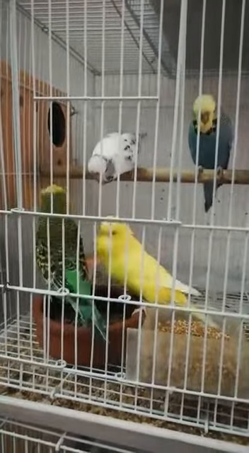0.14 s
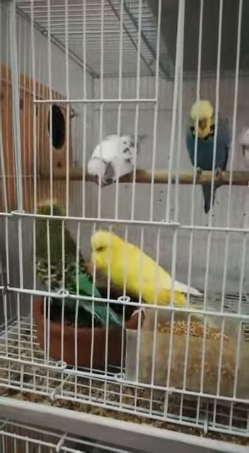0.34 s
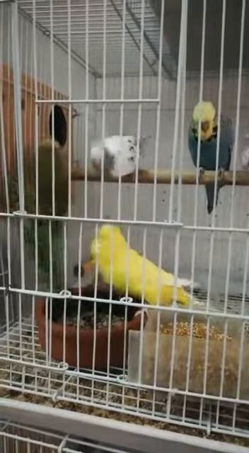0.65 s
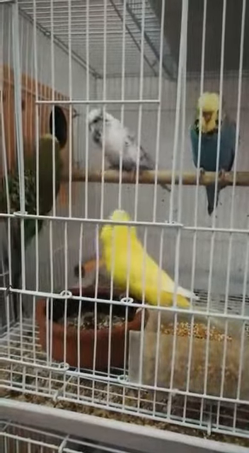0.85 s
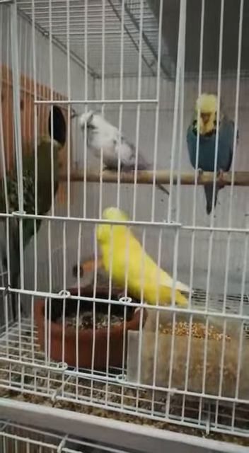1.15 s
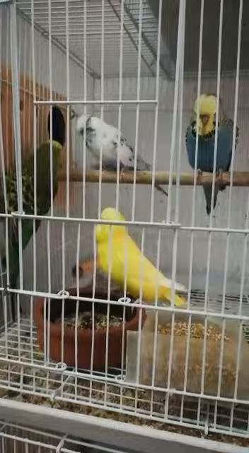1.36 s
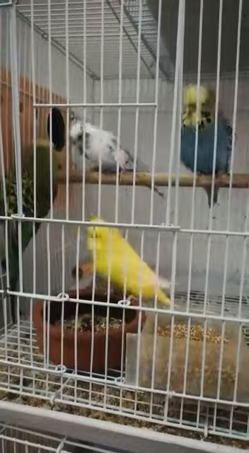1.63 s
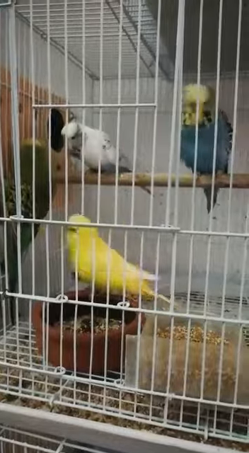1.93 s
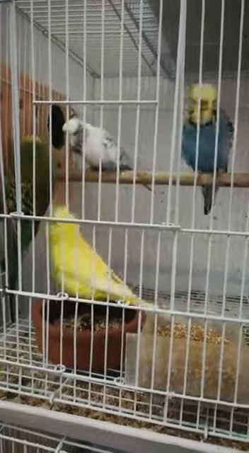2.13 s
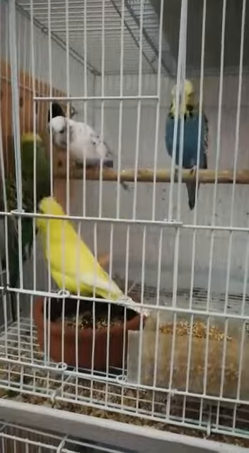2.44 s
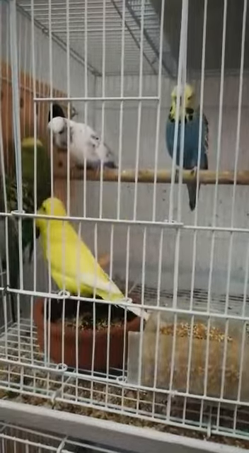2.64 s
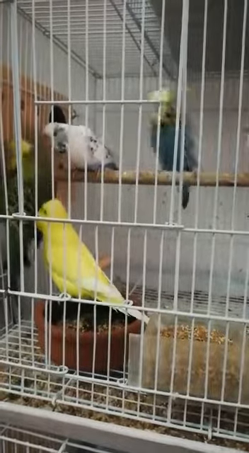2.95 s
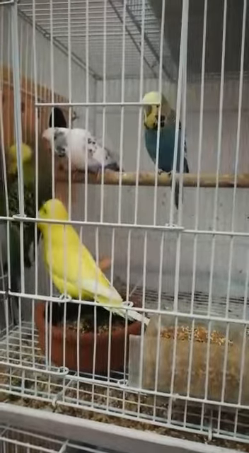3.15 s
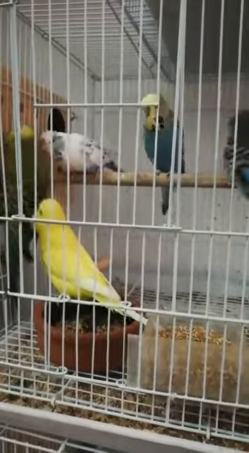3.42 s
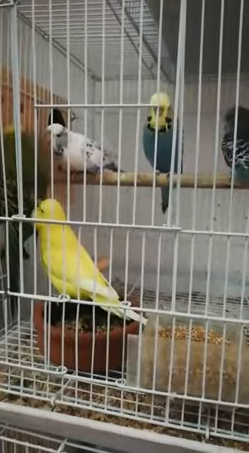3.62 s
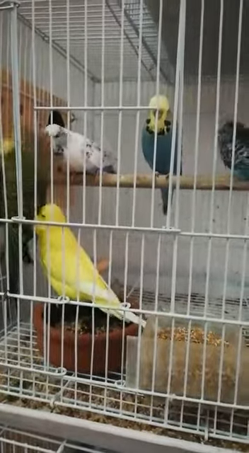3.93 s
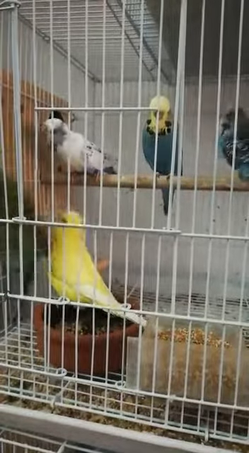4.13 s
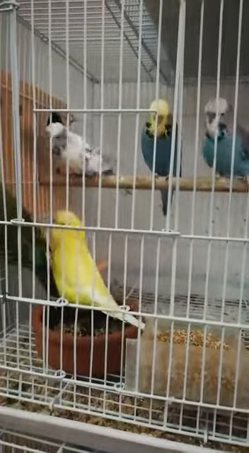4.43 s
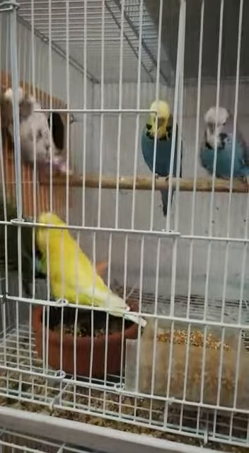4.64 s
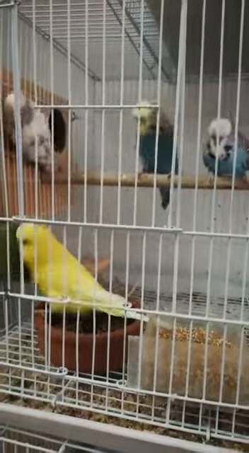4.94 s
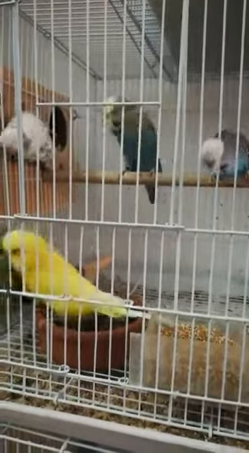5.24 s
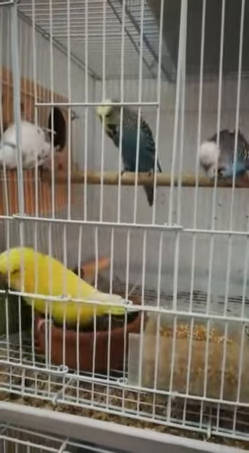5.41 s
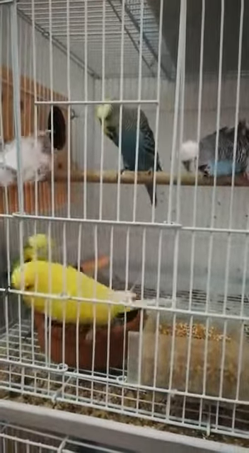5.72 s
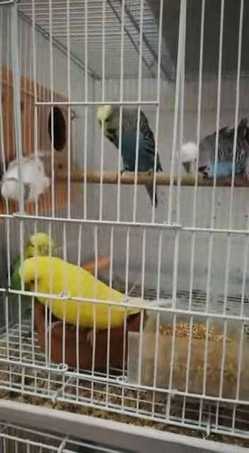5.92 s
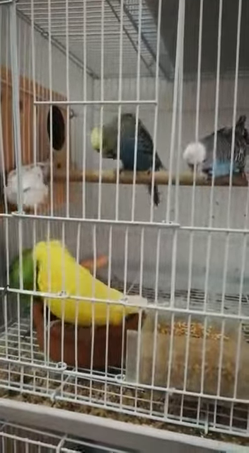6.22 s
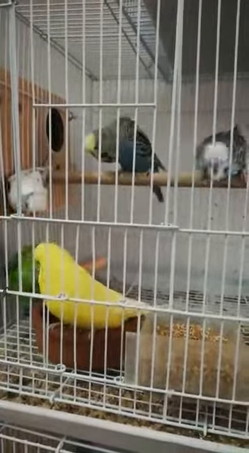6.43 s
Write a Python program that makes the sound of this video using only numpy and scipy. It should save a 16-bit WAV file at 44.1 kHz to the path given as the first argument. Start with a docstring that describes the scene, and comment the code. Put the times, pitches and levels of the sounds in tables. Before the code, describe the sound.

Several caged parakeets chirp, squawk and mutter in uneven bursts, loudest near the middle and end, over fainter distant bird chatter indoors.

```python
"""Loud chirps swoop around 3 kHz: a flock of small parrots chatters in a wire cage in a hard-walled room.
Between the chirps come soft warbles, thin whistles, a squeal, buzzy squawks, clucks, mutters and rasps.
Tonal calls are sums of harmonics on a gliding pitch; harsh calls are pulses and air through resonances.
Noise reflections ring on after each call, over shaped noise for farther birds and a low rumble."""
import sys
import numpy as np
from scipy import signal
from scipy.fft import rfft, irfft, next_fast_len
from scipy.io import wavfile
from scipy.ndimage import uniform_filter1d, minimum_filter1d, map_coordinates

SR = 44100
rng = np.random.default_rng(int(sys.argv[2]) if len(sys.argv) > 2 else 0)


def digitize_waveform(pressure):
    """Quantize a signal to 16-bit integers and store it at the path in sys.argv[1].

    Rows of a 2-D input are taken as channels; values are limited to [-1, 1].
    """
    field = np.atleast_2d(pressure).T
    bounded = np.clip(field, -1, 1)
    quanta = np.round(bounded * 32767).astype(np.int16)
    wavfile.write(sys.argv[1], SR, quanta)


N = 289737
TIME = np.arange(N) / SR
EDGE_HZ = 15400  # upper limit of the harmonics and of the final band


def gain_of(db):
    """Level law: decibels to amplitude."""
    return 10 ** (np.asarray(db) / 20)


def evened(x):
    """Normalisation: scales to rms 1."""
    return x / np.sqrt(np.mean(x ** 2) + 1e-20)


def read(points, hz):
    """Interpolation of a (Hz, value) curve on a log-frequency axis."""
    f, value = np.transpose(points)
    return np.interp(np.log(hz + 1), np.log(f + 1), value)


def coloured(x, points):
    """Linear filtering: multiplies the spectrum by a response given in dB."""
    size = next_fast_len(N + 4096)
    response = gain_of(read(points, np.fft.rfftfreq(size, 1 / SR)))
    return irfft(rfft(x, size) * response, size)[..., :N]


def wobble(size, hz):
    """Random modulation: smooth chance of rms about 1 with hz random knots a second."""
    knots = rng.standard_normal(4096)
    return map_coordinates(knots, [np.arange(size) * hz / SR], order=3, mode="wrap")


def patches(shape, frames, bins):
    """Random field smoothed over time and frequency, rms 1."""
    across_time = uniform_filter1d(rng.standard_normal(shape), frames, axis=1)
    return evened(uniform_filter1d(across_time, bins, axis=0))


def placed(sounds):
    """Superposition: adds (start_s, sound) pairs onto one track."""
    track = np.zeros(N)
    for start, sound in sounds:
        part = track[max(round(start * SR), 0):][:len(sound)]
        part += sound[:len(part)]
    return track


def syrinx(hz, throat_db):
    """Harmonic synthesis: up to eight partials on the pitch curve, weighted by the throat, at rms 1."""
    phase = 2 * np.pi * np.cumsum(hz) / SR
    k = np.arange(1, 9)[:, None]
    weights = gain_of(throat_db(k, k * hz)) * (k * hz < EDGE_HZ)
    partials = weights * np.sin(k * phase)
    return partials.sum(0) / np.sqrt((weights ** 2).sum(0) / 2 + 1e-12)


def tonal_call(rows, throat, jitter, flutter_db, flutter_hz, fade_s):
    """Frequency and amplitude modulation: the syrinx follows (s, Hz, dB, overtones dB) with a quiver."""
    s, *controls = np.transpose(rows)
    s = np.maximum.accumulate(s)
    t = np.arange(s[0] - fade_s / 2, s[-1] + fade_s / 2, 1 / SR)
    pitch, level, overtones_db = (uniform_filter1d(np.interp(t, s, c), size=120) for c in controls)
    quivering = pitch * (1 + jitter * wobble(len(t), flutter_hz))
    tone = syrinx(quivering, lambda k, hz: read(throat, hz) + overtones_db * (k > 1))
    edges = np.clip(np.minimum(t - t[0], t[-1] - t) / fade_s, 0, 1)
    fade = np.sin(np.pi / 2 * edges) ** 2
    return t[0], tone * fade * gain_of(level + flutter_db * wobble(len(t), flutter_hz))


def swoop(start, length, open_hz, middle_hz, close_hz, db, overtones_db):
    """Pitch glide: a parabola through three pitches at steady level, as (s, Hz, dB, overtones dB) rows."""
    u = np.linspace(-1, 1, 33)
    slope = (close_hz - open_hz) / 2
    bend = (open_hz + close_hz) / 2 - middle_hz
    hz = middle_hz + slope * u + bend * u ** 2
    return np.transpose([start + length * (u + 1) / 2, hz, np.full_like(u, db), np.full_like(u, overtones_db)])


def slurred(swoops):
    """Phase continuity: close swoops share one phrase; a wider gap or overlap between rows parts them."""
    slur_s = 0.004  # the rows of a very long swoop lie farther apart, so it becomes a string of short notes
    rows = np.vstack([swoop(*row) for row in swoops])
    return np.split(rows, np.flatnonzero(abs(np.diff(rows[:, 0])) > slur_s) + 1)


# loud chirps, each a quick string of swoops:
# start_s, length_s, open_pitch_hz, middle_pitch_hz, close_pitch_hz, level_db, overtones_db
CHIRP_SWOOPS = [ (.042, 0.014, 3650, 3300, 2710, -20.5, -18), (.083, 0.02, 3065, 2820, 3120, -14.5, -13),
                (.103, .009, 3200, 3120, 2900, -17.5, -15), (.113, 0.044, 2565, 2330, 2796, -17, -18),
                (.371, 0.012, 2500, 2430, 2680, -23.5, -16), (.388, .031, 3162, 3150, 3490, -13, -34),
                (.436, 0.016, 2730, 2850, 2300, -17, -24), (.459, 0.018, 3850, 3580, 3400, -11.5, -15.5),
                (1.026, 0.0087, 3740, 3690, 4190, -24, -24), (1.617, 0.0077, 5060, 4750, 4050, -22, -15),
                (1.632, 0.019, 3345, 3280, 3430, -23, -5), (1.651, 0.0098, 3500, 3780, 3070, -11.5, -2.5),
                (1.665, 0.018, 2950, 2580, 2320, -20.5, -7), (1.692, .014, 2710, 2880, 3136, -17.5, -3),
                (1.707, .019, 3205, 3550, 2925, -14.5, 2.5), (1.727, 0.028, 2885, 2600, 2815, -19.5, 4),
                (1.755, 0.011, 2990, 3310, 3680, -12, -12), (1.778, 0.0076, 4190, 3800, 3270, -16.5, 1),
                (4.567, .013, 2960, 3150, 2670, -10.5, -15), (4.581, 0.013, 2760, 3700, 2870, -13.5, -14),
                (4.604, 0.0052, 2784, 2950, 3170, -11, -20), (4.611, .012, 3070, 3650, 2898, -1.5, -29),
                (4.632, 0.0097, 3495, 3800, 3240, -21, -16), (4.644, 0.03, 3127, 2680, 3110, -13, -19),
                (4.68, 0.014, 3160, 3750, 3000, -9.5, -14), (6.07, .019, 5200, 4750, 4215, -11.5, -2.5),
                (6.094, 0.031, 3344, 3550, 3453, -11.5, 3), (6.128, .014, 2465, 2250, 2070, -21, 17),
                (6.146, 0.036, 2500, 2850, 3080, -24, 18.5), (6.186, 0.011, 3360, 3400, 3290, -9.5, -2.5),
                (6.335, 0.033, 2270, 3050, 2800, -25.5, -17), (6.374, 0.011, 3490, 3400, 3220, -8.5, -38),
                (6.385, .045, 2970, 3300, 2980, -13, 12), (6.44, 0.049, 3580, 2680, 3270, -16, -15),
                (6.486, .011, 3300, 3600, 3200, -10.5, 0), (6.51, 0.013, 2920, 3250, 2850, -19.5, 6),
                (6.527, 0.015, 3010, 4150, 3600, -18.5, -1), (6.552, 0.0173, 3396, 3526, 3260, -15, 4)]
# throat response to the harmonics of a chirp: frequency_hz, weight_db
CHIRP_THROAT = [(2000, 9), (2700, 12), (3400, -1.5), (4500, -7.5), (5600, -18.5), (7000, -21.5),
                (10000, -22), (14000, -23.5)]


def chirping():
    """Rapid frequency sweeps of a harmonic tone, slurred into loud chirps."""
    return placed(tonal_call(phrase, CHIRP_THROAT, jitter=0.02, flutter_db=1.5, flutter_hz=345, fade_s=0.004)
                  for phrase in slurred(CHIRP_SWOOPS))


# soft nasal warbles, one swoop each; the first two rows are brief drops to half pitch inside the loud chirps: #
# start_s, length_s, open_pitch_hz, middle_pitch_hz, close_pitch_hz, level_db, overtones_db
WARBLES = [(0.067, 0.016, 1680, 1627, 1910, -23, 4), (0.422, 0.013, 1800, 1850, 1990, -29, -12),
           (1.035, 0.031, 2460, 2264, 1684, -30.5, 2), (2.487, 0.046, 1926, 1680, 1396, -31, -6),
           (2.682, 0.044, 1600, 1420, 1280, -24.5, 2), (2.731, 0.061, 1300, 1207, 1095, -35, 1),
           (2.889, 0.035, 1397, 1450, 1514, -29.5, -15), (3.028, 0.016, 1900, 2420, 2290, -26.5, -14),
           (3.365, 0.087, 2740, 3030, 2680, -38, -25), (3.724, 0.044, 2630, 2676, 3050, -24.5, -15),
           (3.93, 0.026, 1690, 2080, 1760, -28, -3), (3.959, 0.027, 1735, 2443, 2090, -24.5, -3),
           (4.132, 0.33, 1134, 1132, 1050, -30.5, -2), (4.204, 0.02, 2297, 2985, 4000, -21, -8),
           (5.165, 0.05, 1390, 1598, 1403, -31, -3), (5.217, 0.058, 1390, 1277, 1280, -31.5, -15),
           (5.545, 0.019, 1930, 1920, 1820, -24, -2.5), (5.567, 0.019, 2580, 2520, 2110, -25.5, -9),
           (5.975, 0.09, 3050, 2660, 2260, -29.5, -7), (6.479, 0.027, 2230, 2650, 2730, -18.5, 19)]
# throat response to the harmonics of a warble: frequency_hz, weight_db
WARBLE_THROAT = [(1000, 12), (1500, 2), (2700, 0.5), (4500, 1), (6500, -16), (10000, -34), (14000, -22)]


def warbling():
    """Gentle pitch glides through a throat that favours the low harmonics."""
    return placed(tonal_call(phrase, WARBLE_THROAT, jitter=0.011, flutter_db=2, flutter_hz=388, fade_s=0.01)
                  for phrase in slurred(WARBLES))


# squawk tone filter, pitch jitter per unit roughness, air per unit roughness
SQUAWK_Q, SQUAWK_JITTER, SQUAWK_AIR = 2.49, 0.0792, 1.7
LEAST_JITTER = 0.035  # even the cleanest squawk wavers by this share of its pitch
PULSE_DECAY, SQUAWK_TAPER = 0.55, 0.55  # shares of a pulse and of a call


def squawk(start, length, open_hz, middle_hz, close_hz, db, throat_hz, rate, rough):
    """Amplitude modulation: a gliding, unsteady tone and some air, chopped into pulses after the throat."""
    s, pitch = swoop(start, length, open_hz, middle_hz, close_hz, db, 0).T[:2]
    t = np.arange(s[0], s[-1], 1 / SR)
    size = len(t)

    def throat_db(k, hz):
        return -13 * np.log10(1 + (SQUAWK_Q * (hz / throat_hz - throat_hz / hz)) ** 2)

    jitter = (LEAST_JITTER + SQUAWK_JITTER * rough) * wobble(size, 700.7)
    tone = syrinx(np.interp(t, s, pitch) * (1 + jitter), throat_db)
    air_gain = gain_of(1.17 * throat_db(1, np.fft.rfftfreq(size, 1 / SR) + 1))
    air = irfft(rfft(rng.standard_normal(SR)[:size]) * air_gain, size)
    cycle = np.cumsum(rate * (1 + 0.0562 * wobble(size, 150.5))) / SR % 1
    pulses = np.sin(np.pi * cycle) * np.exp(-cycle / PULSE_DECAY)
    pulses = pulses * gain_of(0.79 * wobble(size, 215)) + 0.011  # a little leaks between pulses
    voice = (tone + SQUAWK_AIR * rough * evened(air)) * pulses
    return start, gain_of(db) * evened(voice * signal.windows.tukey(size, SQUAWK_TAPER))


# buzzy squawks: start_s, length_s, open_pitch_hz, middle_pitch_hz, close_pitch_hz, level_db,
# throat_hz, pulse_rate_hz, roughness (0-1), farness (0-1)
SQUAWKS = [(.6, 0.055, 1604, 1703, 1720, -18, 3400, 202.6, 0.21, 0),
           (.635, 0.07, 1659, 1765, 1823, -18, 4520, 206.5, 0.42, 0.06),
           (0.745, 0.084, 1748, 1781, 1812, -17, 3630, 196, 0.46, 0),
           (1.781, 0.021, 1688, 1411, 1130, -28, 2800, 293, 0.94, 0.1),
           (2.154, 0.028, 1633, 1676, 1656, -16, 3950, 406, 0.41, 0.01),
           (2.262, 0.028, 1837, 1489, 1065, -22, 2880, 389, 0.4, 0.07),
           (2.632, 0.15, 3386, 2892, 2545, -31, 2690, 262, 0.06, 0.8),
           (3.632, 0.11, 2240, 2433, 2514, -33.5, 4000, 275, 0.05, 0.6),
           (3.758, 0.029, 1350, 1425, 1480, -18, 2990, 261, .6, 0.09),
           (3.942, 0.079, 2190, 2180, 2060, -26.5, 4360, 301, 0.07, 0.8),
           (4.029, 0.052, 1661, 1570, 1490, -21.5, 3120, 261, 0.72, 0.03),
           (4.57, .024, 1450, 1676, 1640, -19.5, 3300, 296, .5, 0),
           (4.862, 0.095, 2860, 2756, 2725, -31, 6240, 299, 0.07, 0.7),
           (4.972, .048, 1757, 1650, 1490, -20, 2990, 328, 0.36, 0),
           (5.355, 0.053, 1357, 1554, 1325, -21.5, 3580, 234, 0.36, 0),
           (6.376, 0.051, 1540, 1757, 1610, -15, 4900, 329, 0.63, 0)]


def squawking():
    """Power sharing: farness divides the energy of each squawk between a near and a far track."""
    calls = [(squawk(*row), farness) for *row, farness in SQUAWKS]
    near = placed((s, x * np.sqrt(1 - farness)) for (s, x), farness in calls)
    far = placed((s, x * np.sqrt(farness)) for (s, x), farness in calls)
    return near, far


def held_note(start, length, open_hz, held_hz, db, fade_db_per_s):
    """Exponential settling of pitch under a steady fade, as (s, Hz, dB, overtones dB) rows."""
    settle_s = 0.013
    t = np.linspace(0, length, 65)
    hz = held_hz + (open_hz - held_hz) * np.exp(-t / settle_s)
    return np.transpose([start + t, hz, db - fade_db_per_s * t, np.zeros_like(t)])


# held whistles that slide onto their pitch: start_s, length_s, open_pitch_hz, held_pitch_hz, level_db
WHISTLES = [(1.06, 0.131, 5380, 5570, -32), (3.864, 0.095, 5400, 5295, -25.5)]
# throat response to the harmonics of a whistle: frequency_hz, weight_db
WHISTLE_THROAT = [(5500, -5), (10000, -26)]


def whistling():
    """Near-pure tones: a throat that weakens the overtones leaves thin, fading whistles."""
    return placed(tonal_call(held_note(*row, fade_db_per_s=53), WHISTLE_THROAT,
                             jitter=0.0022, flutter_db=4.0, flutter_hz=308, fade_s=0.0223)
                  for row in WHISTLES)


# a held squeal: start_s, length_s, open_pitch_hz, held_pitch_hz, level_db
SQUEALS = [(5.746, 0.16, 2230, 2130, -31)]
# throat response to the harmonics of the squeal: frequency_hz, weight_db
SQUEAL_THROAT = [(2150, -61), (4300, -10), (6450, -9), (8600, -12.5), (10800, -11.5), (13000, -12),
                 (15000, -18)]


def squealing():
    """Suppressed fundamental: the third harmonic of a fading note is the strongest."""
    return placed(tonal_call(held_note(*row, fade_db_per_s=120), SQUEAL_THROAT,
                             jitter=0.0059, flutter_db=0.5, flutter_hz=217, fade_s=0.013)
                  for row in SQUEALS)


def harsh_call(start, length, rate, rough, db, first_hz, second_hz, q, second_db, puff, taper):
    """Source and filter: slaps of the syrinx and puffs of air excite two throat resonances."""
    size = max(round(length * SR), 256)
    turns = np.cumsum(rate * (1 + 0.043 * wobble(size, 250))) / SR
    slaps = np.diff(np.floor(turns), prepend=0)
    puff_shape = 0.12 + np.exp(-(turns % 1) / puff)  # puff is the decay as a share of a pulse
    puffs = puff_shape * rng.standard_normal(SR)[:size]
    drive = (1 - rough) * evened(slaps) + rough * evened(puffs)
    drive = drive * signal.windows.tukey(size, taper)
    hz = np.fft.rfftfreq(2 * size, 1 / SR) + 1
    first, second = ((1 + 1j * q * (hz / f - f / hz)) ** -2 for f in (first_hz, second_hz))
    sound = irfft(rfft(drive, 2 * size) * (first + gain_of(second_db) * second))
    return start, gain_of(db) * sound / np.sqrt(np.sum(sound ** 2) / size + 1e-20)


def mottled(x, patchy_db):
    """Random spectral patches: peaks and dips drift over time and frequency; level is kept."""
    z = signal.stft(x, nperseg=256, noverlap=192)[2]
    shaped = z * gain_of(patchy_db * np.clip(patches(z.shape, 28, 4), -2, 2))
    shaped *= np.linalg.norm(z, axis=0) / (np.linalg.norm(shaped, axis=0) + 1e-12)
    return signal.istft(shaped, nperseg=256, noverlap=192)[1][:N]


# short dry clucks: start_s, length_s (at least 256 samples sound), level_db, throat_hz, low_resonance_db
CLUCKS = [(0.956, 0.0093, -31, 3200, -10), (1.104, 0.0052, -24, 3930, -20),
          (3.593, 0.0069, -17.5, 4130, -52), (4.353, 0.0046, -32.5, 2460, 0),
          (4.871, 0.011, -21.5, 3400, -17), (5.485, 0.019, -24, 2950, -8), (5.729, 0.013, -22.5, 3550, -7)]


def clucking():
    """Damped resonance: a very short burst of airy pulses rings the throat and a low resonance."""
    return placed(harsh_call(s, length, rate=470, rough=0.93, db=db, first_hz=hz, second_hz=1040, q=1.47,
                             second_db=low_db, puff=0.13, taper=0.74)
                  for s, length, db, hz, low_db in CLUCKS)


# quiet, throaty mutters: start_s, length_s, level_db, throat_hz
MUTTERS = [(2.364, 0.073, -32.5, 2170), (2.456, 0.075, -33, 2020), (2.605, 0.049, -32.5, 2530),
           (2.944, 0.034, -33, 4970), (3.084, 0.02, -34, 4500), (3.131, 0.053, -32, 1840),
           (3.264, 0.019, -36.5, 1930), (3.383, 0.05, -34.5, 1820), (3.471, 0.022, -37.5, 2020),
           (6, 0.051, -29, 2400)]


def muttering():
    """Broad resonance: soft airy pulses through a low-Q throat and a weak high beak resonance."""
    return placed(harsh_call(s, length, rate=360, rough=0.8, db=db, first_hz=hz, second_hz=10500, q=0.54,
                             second_db=-18, puff=0.29, taper=0.33)
                  for s, length, db, hz in MUTTERS)


# throat response for clucks and mutters: frequency_hz, weight_db
HARSH_THROAT = [(400, -0.5), (1000, 6), (5000, 0.5), (6500, -0.5), (10000, 0.5), (14000, -2)]


def scolding():
    """Spectral shaping: one throat response colours the mottled clucks and mutters."""
    return coloured(mottled(clucking() + muttering(), patchy_db=4.5), HARSH_THROAT)


# hissy rasps from farther birds: start_s, length_s, level_db, throat_hz, q (sharpness), hiss_db
RASPS = [(0, 0.066, -33.5, 6400, 4.7, -10.5), (.087, .12, -28, 4000, 4.3, -15),
         (0.221, 0.12, -33, 4630, 2.5, -15.5), (0.495, 0.12, -39.5, 5300, 1.4, -20),
         (.842, .13, -37.5, 4420, 4.2, -40), (1.536, 0.097, -33, 3460, 0.4, -26),
         (3.96, .11, -35.5, 6900, 1.3, -16), (4.126, 0.082, -36.5, 7130, 0.56, -17),
         (4.317, 0.12, -25, 4650, 0.48, -33), (4.456, 0.12, -23, 4130, 0.75, -12),
         (5.049, 0.14, -35, 2730, 0.22, -18), (5.251, 0.11, -30, 5400, .6, -23)]


def rasping():
    """Turbulence: mostly unsteady air in pulses, through the throat and a 9 kHz hiss resonance."""
    rasps = placed(harsh_call(s, length, rate=150, rough=0.89, db=db, first_hz=hz, second_hz=9000, q=q,
                              second_db=hiss_db, puff=0.25, taper=0.73)
                   for s, length, db, hz, q, hiss_db in RASPS)
    return mottled(rasps, patchy_db=3.5) * gain_of(1.8 * wobble(N, 90))


def early_reflections(x, echo_db):
    """Early reflections: direct sound, left port first, then a random scatter of echoes in about 10 ms."""
    span_s = 0.01
    taps = np.zeros((2, 2048))
    at = (30 + rng.random((2, 16)) * span_s * SR).astype(int)
    echoes = rng.choice([-1, 1], at.shape) * gain_of(echo_db) / np.sqrt(at.shape[1])
    np.put_along_axis(taps, at, echoes, 1)
    taps[0, 0] = taps[1, 3] = 1  # direct sound, three samples later on the right
    return signal.oaconvolve(x[None], taps / np.linalg.norm(taps[0]), axes=1)[:, :N]


# decay of the room: frequency_hz, t60_s
ROOM = [(300, 1), (1500, 1), (3000, 1), (5500, 0.66), (8000, 0.66), (14000, 0.52)]


def room(x):
    """Reverberation: a diffuse noise tail for each port, each band decaying at its own rate."""
    hz, t, z = signal.stft(rng.standard_normal((2, SR)), SR, nperseg=256)
    decay = gain_of(-60 * t / read(ROOM, hz)[:, None])
    tail = signal.istft(z * decay, SR, nperseg=256)[1]
    tail *= np.clip(np.arange(tail.shape[1]) / SR / 0.028, 0, 1)  # builds up over 28 ms
    return signal.fftconvolve(x[None], tail / np.linalg.norm(tail[0]), axes=1)[:, :N]


def far_flock(spectrum, level_db):
    """Diffuse field: distant calls, smeared by the room, are noise in drifting spectral patches."""
    frames, hz = N // 128 + 5, np.fft.rfftfreq(512, 1 / SR)
    shape = (2, len(hz), frames)
    z = rng.standard_normal(shape) + 1j * rng.standard_normal(shape)
    z *= gain_of(read(spectrum, hz)[:, None] + 3 * patches(shape[1:], 22, 5))  # patches of 3 dB rms
    return evened(signal.istft(z, nperseg=512, noverlap=384)[1][:, :N]) * gain_of(level_db)


# the farther flock, before the layer gains: time_s, chatter_level_db, warbling_level_db
FLOCK = [(0.0, -33.5, -49), (0.53, -40.5, -53.5), (0.86, -36.5, -39), (1.43, -46.5, -45),
         (1.85, -52.5, -50.5), (3.112, -48, -35.5), (4.87, -31.5, -44.5), (5.1, -38, -41.5),
         (5.86, -48.5, -47), (6.57, -28, -50.5)]
# relative spectrum of the far chatter: frequency_hz, density_db (per Hz)
CHATTER = [(150, -125), (1500, -11.5), (2300, 0.5), (3200, 9), (5000, -3.5), (6500, -15.5), (10000, -10.5),
           (15000, -16)]
# relative spectrum of the far low warbling: frequency_hz, density_db (per Hz)
WARBLING = [(150, -8), (480, -2.5), (800, 5), (1100, 14), (1600, 16), (2200, 17), (3200, -24), (7000, -69)]


def distant_birds():
    """Incoherent addition: bright chatter and low warbling rise and fall independently."""
    s, chatter_db, warbling_db = np.transpose(FLOCK)
    chatter = far_flock(CHATTER, np.interp(TIME, s, chatter_db) + 2.5)
    return chatter + far_flock(WARBLING, np.interp(TIME, s, warbling_db) + 2.0)


# relative spectrum of the rumble: frequency_hz, density_db (per Hz)
RUMBLE = [(20, -9), (45, -5), (85, 6), (115, -3), (150, -11), (230, -10.5), (330, -5), (420, -23.5),
          (1000, -8.5), (5000, -22), (15000, -17)]
# course of the rumble: time_s, level_db
RUMBLE_DB = [(0.0, -51), (0.51, -56.5), (3.38, -49), (4.76, -53), (5.14, -43.5), (6.57, -58.5)]


def rumble(apart):
    """Coherence: low room noise is nearly the same at both ports, with a small independent share."""
    noise = rng.standard_normal(N) + apart * rng.standard_normal((2, N))
    return evened(coloured(noise, RUMBLE)) * gain_of(np.interp(TIME, *np.transpose(RUMBLE_DB)))


def scene():
    """Direct-to-reverberant ratio: near birds and warbles are mostly direct, far calls more of the room."""
    near_squawks, far_squawks = squawking()
    near = gain_of(1) * chirping() + gain_of(0.5) * near_squawks + scolding()
    warbles = warbling()
    far = gain_of(-0.5) * rasping() + whistling() + squealing() + far_squawks
    direct = early_reflections(near + gain_of(-1.0) * warbles, echo_db=-3.5)
    direct = direct + gain_of(1.5) * early_reflections(far, echo_db=5.5)
    ringing = room(gain_of(-12.0) * near + gain_of(-13.5) * warbles + gain_of(-3.5) * far)
    return direct + ringing + distant_birds() + rumble(apart=0.024)


# colour of the two microphone ports: frequency_hz, response_db
LEFT = [(200, 2), (1000, -9.5), (2000, -6.5), (3200, -7.5), (4900, -5), (6300, 1.5), (8000, 2), (10000, 1),
        (12000, -14), (15000, -21)]
RIGHT = [(200, 2.5), (1000, -7.5), (2000, -3.5), (3200, 1), (4300, 1), (5200, 3.5), (6100, 1), (8000, -5.5),
         (10000, -20), (14000, -26)]


def record(dry):
    """Transducer response: each port has its colour; a fast limiter holds peaks; then the band limit."""
    ports = np.array([coloured(dry[0], LEFT), coloured(dry[1], RIGHT)])
    allowed = np.minimum(1, 0.95 / (abs(ports).max(0) + 1e-9))
    ports = ports * uniform_filter1d(minimum_filter1d(allowed, size=201), size=201)
    lowpass = signal.firwin(511, EDGE_HZ, window=("kaiser", 9), fs=SR)
    return signal.oaconvolve(ports, lowpass[None], "same")


dry = scene()
out = record(dry)
digitize_waveform(out)
```